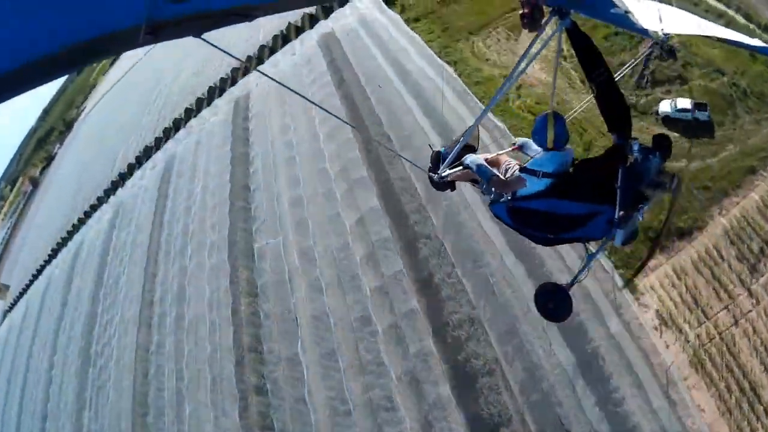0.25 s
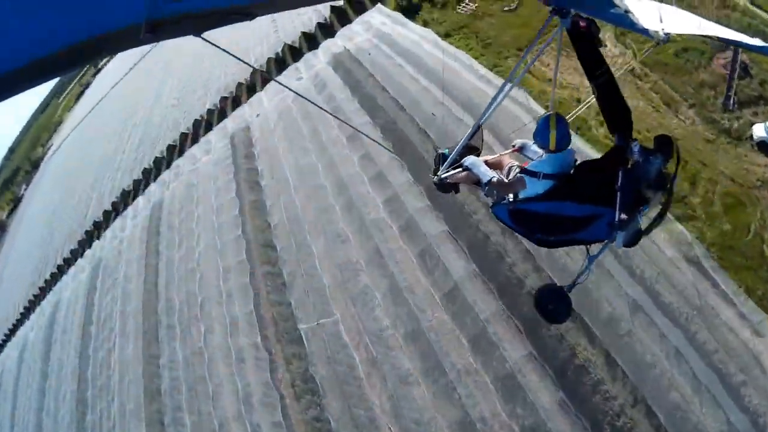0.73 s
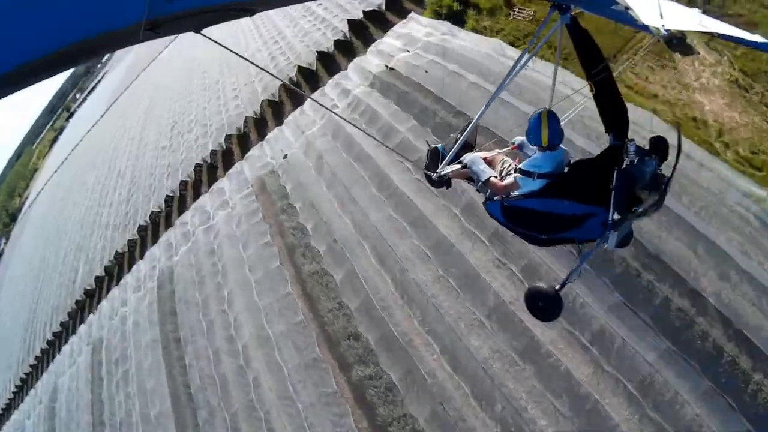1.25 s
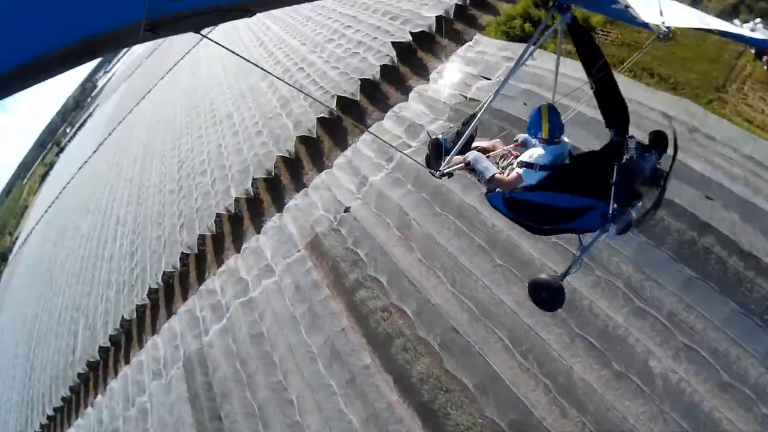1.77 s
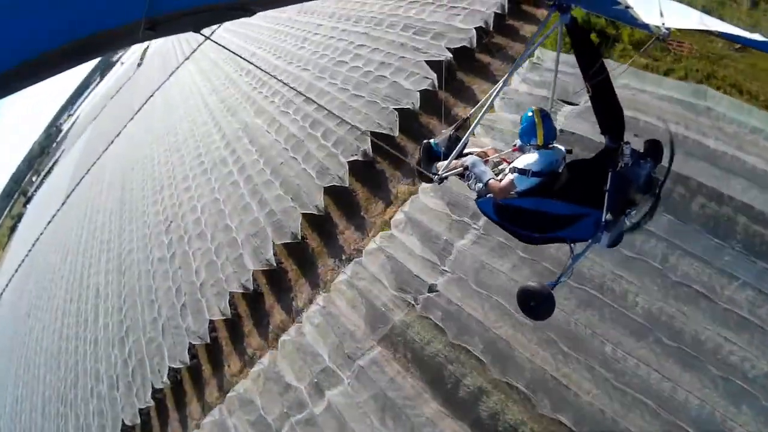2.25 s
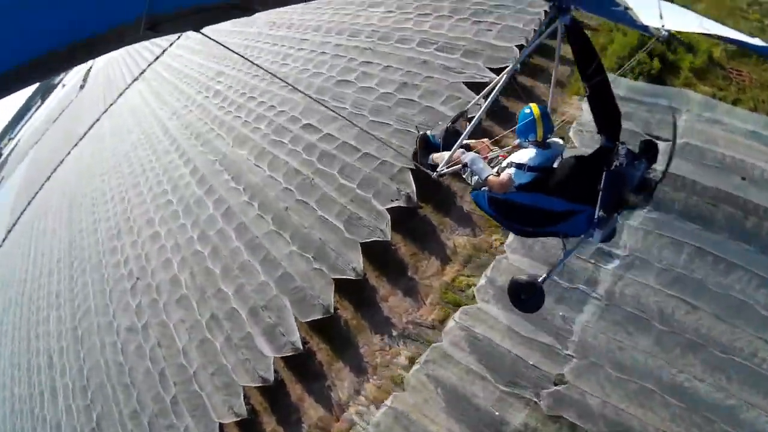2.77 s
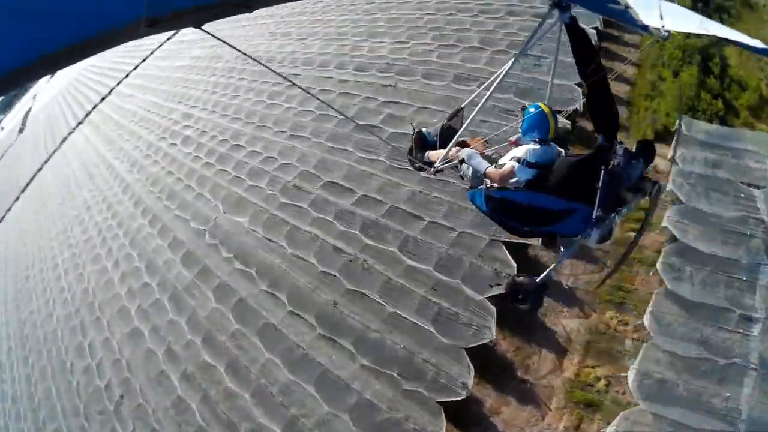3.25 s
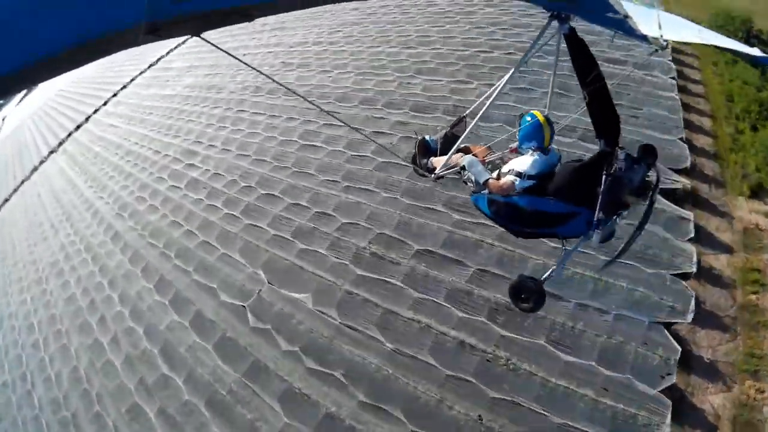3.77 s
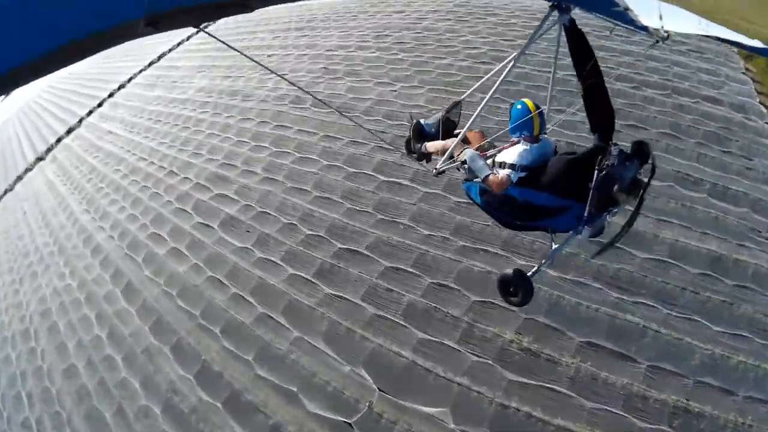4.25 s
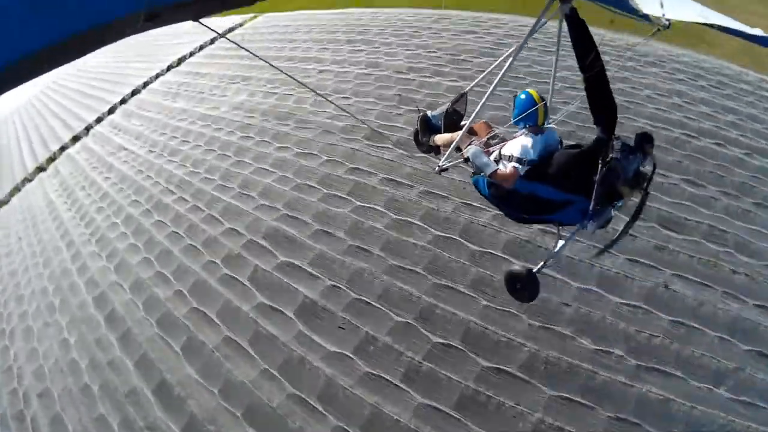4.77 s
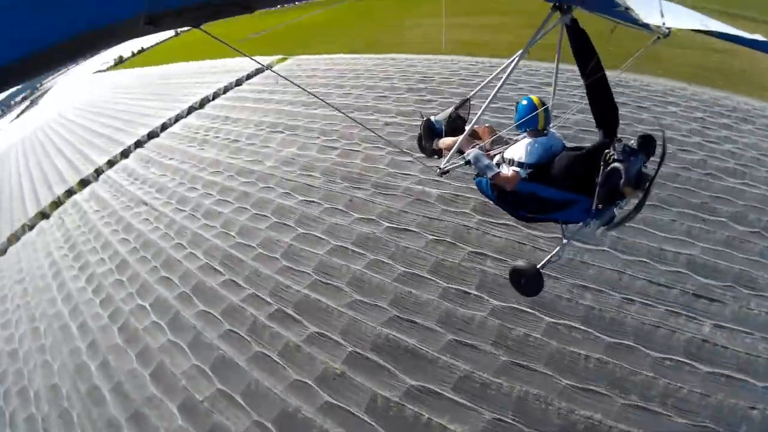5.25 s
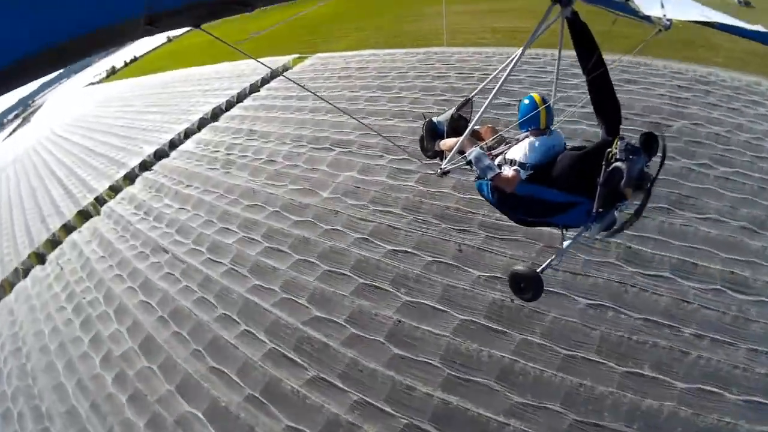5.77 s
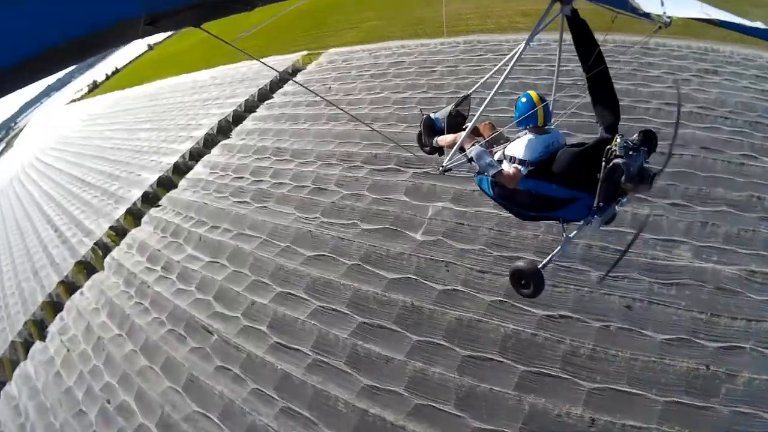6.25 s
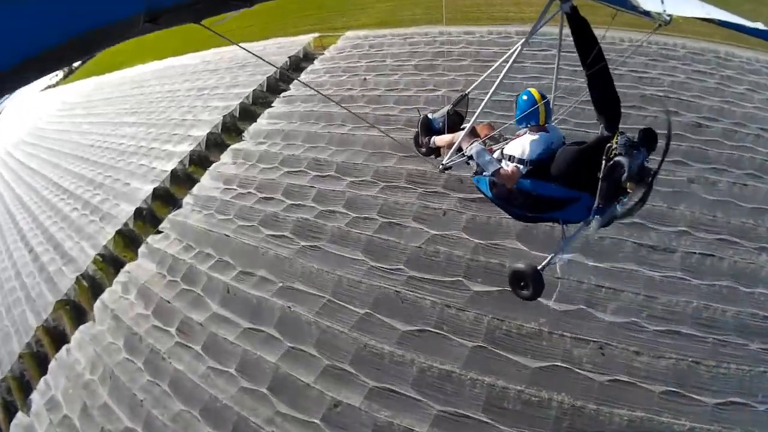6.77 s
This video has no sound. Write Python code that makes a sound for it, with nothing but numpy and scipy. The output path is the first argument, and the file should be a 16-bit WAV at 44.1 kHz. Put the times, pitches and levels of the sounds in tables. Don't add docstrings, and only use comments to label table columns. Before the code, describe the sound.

On a small open microlight in flight, low wind roars and thumps against an exposed microphone on the wing, clipping harshly. Under it a two-stroke engine buzzes steadily with propeller chop and metallic clatter. Around three seconds the wind falls away and the engine stands out clearly; about a second later gusts slam back, stronger than before, and continue to the end.

```python
import sys
import numpy as np
from scipy import signal
from scipy.fft import rfft, irfft, next_fast_len
from scipy.io import wavfile
from scipy.ndimage import uniform_filter1d

SR = 44100
rng = np.random.default_rng(int(sys.argv[2]) if len(sys.argv) > 2 else 0)


def to_wav(s):
    ch = np.atleast_2d(s).T
    pcm = np.round(np.clip(ch, -1, 1) * 32767)
    wavfile.write(sys.argv[1], SR, pcm.astype(np.int16))


def invert_db(level):
    return 10 ** (np.asarray(level, dtype=float) / 20)


N = 309582

# time in seconds, firings per second in Hz.
ENGINE_SPEED = [(0, 117.0), (.8, 117.3), (1.2, 118.55), (1.55, 119.3), (2.0, 119.3), (2.7, 120.2),
                (2.9, 119.85), (3.45, 120.25), (3.65, 119.8), (3.9, 120.05), (4.35, 119.0), (5.1, 120.25),
                (5.4, 119.15), (5.7, 118.8), (6.4, 116.1), (6.8, 114.3), (7.02, 113.7)]
BLADES_PER_FIRING = 2 / 2.841

# time in seconds, rms level in dB.
WIND_LEVEL = [(0.0, -12.5), (0.45, -12), (0.6, -9.5), (1.2, -8.5), (1.55, -9), (2.0, -7.5), (2.65, -8.5),
              (2.82, -9.5), (3.05, -20), (3.72, -23), (3.93, -15), (4.0, -19.5), (4.45, -9.5), (4.6, -5.5),
              (5.05, -7), (6.0, -5), (6.65, -7.5), (7.02, -5)]
# frequency in Hz, strength in dB per Hz.
EDDY_COLOUR = [(8, -45), (20, -21), (45, -14), (80, -8.5), (120, -4.5), (200, -4), (320, -4.5), (450, -7),
               (540, -9), (620, -13.5), (720, -22), (900, -34), (1300, -50), (2500, -90)]
# start in seconds, force in dB, pitch in Hz.
HARD_BUFFETS = [(0.098, -0.5, 248), (0.138, -0.5, 303), (0.19, -2, 477), (0.337, 2.4, 220),
                (0.413, -1.5, 253), (0.451, 4, 365), (0.555, -1, 430), (0.648, 2, 269), (0.668, 1.5, 298),
                (0.822, 4.5, 214), (0.912, 2, 272), (1.038, 1.9, 342), (1.07, 2, 282), (1.15, 5, 197),
                (1.226, 3, 234), (1.418, 4, 386), (2.69, 4, 320), (2.781, 0, 403), (2.881, 0.5, 475),
                (2.941, 2.5, 488), (3.917, -7, 501), (3.946, -3, 245), (4.166, 2.3, 301), (4.186, 1.5, 390),
                (4.229, -2, 312), (4.295, -2, 331), (4.333, 2, 430), (4.399, 5, 247), (4.428, .7, 435),
                (4.466, 5.5, 274)]
# time in seconds, depth in dB (negative for a surge).
WIND_LULLS = [(0.06, 3), (0.17, 8), (0.3, 0.5), (0.38, 1), (0.53, 3), (0.59, -2.5), (0.62, 6), (0.79, 4),
              (0.87, 1.5), (1.01, 5), (1.31, 9), (1.41, 3.5), (6.84, 3.5), (1.84, 3), (2.67, 1.5),
              (2.74, 4.5), (2.87, 5), (3.01, 4), (4.28, 4), (4.49, 6), (4.52, -4), (4.545, -3), (4.569, 14),
              (5.0, 5.5), (5.578, 7.5), (5.69, 3.5), (6.5, 2.5), (6.664, 3), (6.73, 1.5), (6.9, 2.5)]
LULL_S = 0.014

TONE_ORDERS = [(0, 1), (0, 2), (0, 3), (0, 4), (0, 5), (0, 6), (5, 0), (1, 0), (2, 0), (3, 0), (4, 0),
               (0, 7), (7, 0), (8, 0), (2, 1), (2, 2), (2, 3), (2, 4), (2, 5), (1, 1), (1, 3), (3, 2)]
TONE_LEVELS = [-31, -32, -32, -38, -42, -39, -43, -34, -34, -36, -34, -35, -46, -51, -30, -27, -30, -36,
               -39, -43, -45, -42]
# multiple of the firing rate, rms level in dB.
FIN_TONES = [(14, -47), (16, -47), (18, -47), (27, -49), (29, -54), (43, -57), (45, -48), (48, -55),
             (49, -52), (50, -51), (51, -55), (58, -55), (59, -57), (60, -57), (61, -52), (62, -56),
             (66, -65), (87, -62), (91, -60), (94, -57), (96, -64), (100, -63), (106, -60), (110, -64)]
# frequency in Hz, width in Hz,
# blade swish in dB, fresh clatter in dB, repeating knock in dB.
RESONANCES = [(546, 450, 9.5, -5.5, -40), (2046, 890, 1.5, -5.5, -4.5), (3146, 680, -3.5, -13, -22),
              (4080, 580, -10.5, -15, -15), (4750, 670, -17.5, -15, -24), (5410, 680, -14, -10, -15),
              (6140, 700, -12.5, -13.5, -13), (7210, 1090, -19.5, -13.5, -42), (9300, 870, -31, -25, -30),
              (11150, 1280, -18, -17, -14.5), (13000, 1050, -20, -17, -22), (14500, 900, -44, -27, -32)]
SWISH_COLUMN, CLATTER_COLUMN, KNOCK_COLUMN = 2, 3, 4

NEAR_DB, TURN_S, FADE_BEFORE_DB_PER_S, FADE_AFTER_DB_PER_S2 = -38, 3.4, 0.49, 0.19
DULL_HZ, DULL_START_S, DULL_SHARE = 10300, 3.8, 0.26
CLIP_TOP, CLIP_BOTTOM = .692, -.655
SLIP_HZ, SLIP_SHARE = 7000, 0.1


def evened(x):
    return x / np.sqrt(np.mean(x ** 2) + 1e-20)


def curve(rows):
    s, *columns = np.transpose(rows)
    return [np.interp(np.arange(N) / SR, s, c) for c in columns]


def coloured(x, gain):
    size = next_fast_len(N)
    hz = np.fft.rfftfreq(size, 1 / SR)
    return irfft(rfft(x, size) * gain(hz), size)[:N]


def wander(top_hz, low_hz=18.0):
    gain = lambda hz: 1 / np.sqrt((1 + hz / low_hz) * (1 + (hz / top_hz) ** 4))
    return evened(coloured(rng.standard_normal(N), gain))


def resonances(column):
    def gain(hz):
        power = 0
        for row in RESONANCES:
            off_centre = 2 * (hz - row[0]) / row[1]
            power = power + (invert_db(row[column]) / (1 + off_centre ** 2)) ** 2
        return np.sqrt(power)
    return gain


def throb(turns, depth, sharp):
    return 1 + depth * np.exp(sharp * (np.cos(2 * np.pi * turns) - 1))


def gusts():
    t = np.arange(N) / SR
    level_db = curve(WIND_LEVEL)[0]
    for s, depth_db in WIND_LULLS:
        level_db = level_db - depth_db * np.exp(-((t - s) / LULL_S) ** 2)
    return level_db


def slaps():
    out = np.zeros(N + SR)
    t = np.arange(-441, 441) / SR
    for s, force_db, hz in HARD_BUFFETS:
        swing = np.exp(-(hz * t / 0.66) ** 2) * np.cos(2 * np.pi * (hz * t + 0.12))
        start = round(s * SR)
        out[start:start + len(t)] += invert_db(force_db) * swing
    return out[round(.0075 * SR):][:N]


def wind(blades):
    level_db = gusts()
    strength = np.clip((level_db + 15) / 8, 0, 1)
    f, db = np.transpose(EDDY_COLOUR)
    colour = lambda hz: invert_db(np.interp(np.log(hz + 1), np.log(f + 1), db))

    depth_db = 3.5 - 1.25 * strength
    puffs = 2.49 * np.tanh(wander(top_hz=87.6, low_hz=60) / 2.27)
    buffets = invert_db(depth_db * puffs) * throb(blades, depth=0.36, sharp=2.7)
    eddies = coloured(rng.standard_normal(N) * buffets, colour)
    eddies /= np.sqrt(uniform_filter1d(eddies ** 2, size=SR // 12))

    hard = slaps()
    whole = invert_db(level_db + 3.17 * strength ** 2) ** 2
    hard_power = uniform_filter1d(hard ** 2, size=SR // 16)
    rest = np.maximum(whole - hard_power, 0.48 * whole)
    return np.sqrt(rest) * eddies + hard


def nearness():
    since = np.arange(N) / SR - TURN_S
    before, after = np.minimum(since, 0), np.maximum(since, 0)
    return NEAR_DB + FADE_BEFORE_DB_PER_S * before - FADE_AFTER_DB_PER_S2 * after ** 2


def dulled(x):
    share = DULL_SHARE * np.clip(np.arange(N) / SR - DULL_START_S, 0, 1)
    treble = coloured(x, lambda hz: 1 / (1 + (DULL_HZ / (hz + 1)) ** 16))
    return x - share * treble


def swish(blades):
    hiss = rng.standard_normal(N) * throb(blades, depth=1.45, sharp=2.55)
    hiss *= invert_db(0.78 * wander(top_hz=60))
    return coloured(hiss, resonances(SWISH_COLUMN))


def fins(firings):
    out = np.zeros(N)
    starts = rng.random(len(FIN_TONES))
    for (order, db), start in zip(FIN_TONES, starts):
        level = invert_db(db + 3.7 * wander(top_hz=2))
        out += level * np.sqrt(2) * np.sin(2 * np.pi * (order * firings + start))
    return out


def tones(firings, blades):
    out = np.zeros(N)
    for (engine_order, blade_order), db in zip(TONE_ORDERS, TONE_LEVELS):
        turns = engine_order * firings + blade_order * blades
        out += invert_db(db) * np.sqrt(2) * np.sin(2 * np.pi * turns)
    return out * invert_db(0.2 + 0.58 * wander(top_hz=3.7))


def engine(firings):
    fired = np.flatnonzero(np.diff(np.floor(firings))) + 1
    late = (firings[fired] % 1) / (firings[fired] - firings[fired - 1])
    force = invert_db(1.2 * rng.standard_normal(len(fired)))

    offsets = np.arange(-8, 9)
    pulses = np.sinc(offsets + late[:, None]) * np.hanning(19)[1:-1]
    kicks = np.zeros(N + 16)
    kicks[fired[:, None] + offsets + 8] = force[:, None] * pulses

    t = np.arange(360) / SR
    knocks = rng.standard_normal(360) * np.exp(-t / 0.0034)
    repeating = evened(signal.oaconvolve(kicks[8:], knocks)[:N])
    fresh = rng.standard_normal(N) * throb(firings - .2, depth=1.28, sharp=3.3)
    fresh *= invert_db(0.44 * wander(top_hz=90))
    return coloured(repeating, resonances(KNOCK_COLUMN)) + coloured(fresh, resonances(CLATTER_COLUMN))


def scene():
    firings = np.cumsum(curve(ENGINE_SPEED)[0]) / SR
    blades = BLADES_PER_FIRING * firings
    nearness_db = nearness()
    machine = invert_db(nearness_db + 16.5) * (engine(firings) + swish(blades))
    machine += invert_db(nearness_db + 36.0) * fins(firings)
    return (wind(blades) + tones(firings, blades) + dulled(machine))[None]


def band_limit(x):
    return signal.sosfilt(signal.butter(12, 15730, fs=SR, output="sos"), x)


def record(dry):
    give = .04 * np.tanh(np.minimum(dry - CLIP_BOTTOM, 0) / .3)
    clipped = np.clip(dry, CLIP_BOTTOM, CLIP_TOP) + give
    treble = lambda hz: 1 / (1 + (SLIP_HZ / (hz + 1)) ** 8)
    slipped = SLIP_SHARE * coloured((dry - clipped)[0], treble)
    return band_limit(clipped + slipped)


dry = scene()
out = record(dry)
to_wav(out)
```